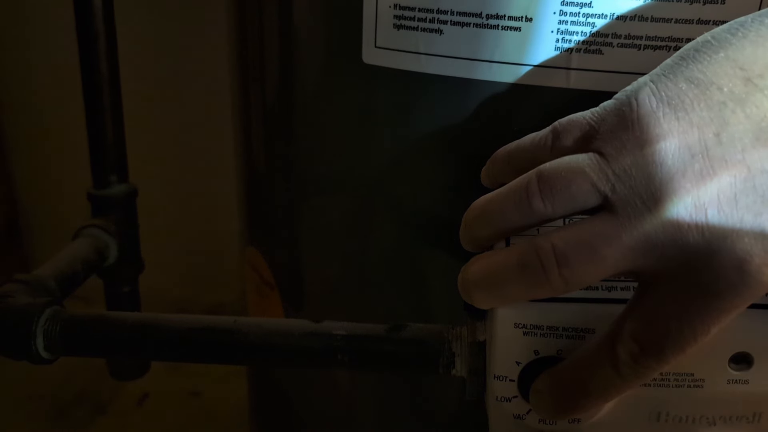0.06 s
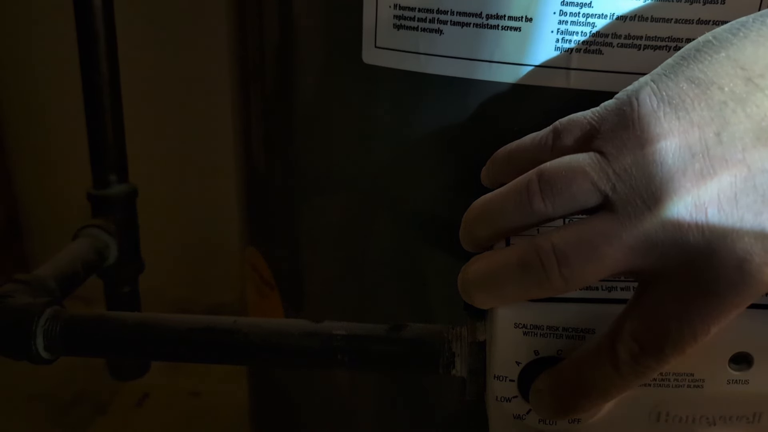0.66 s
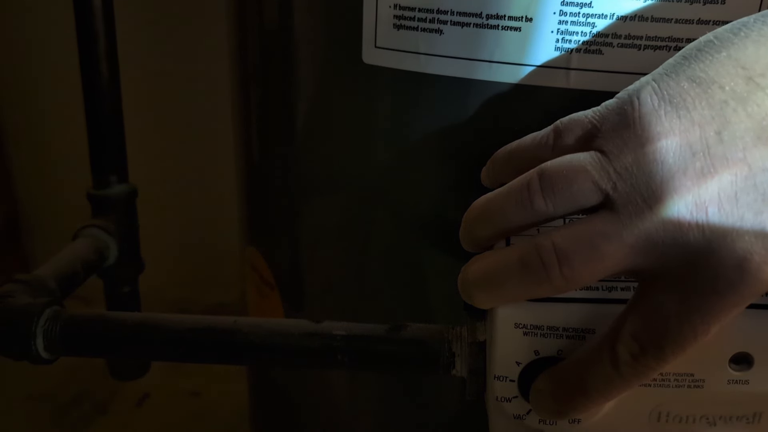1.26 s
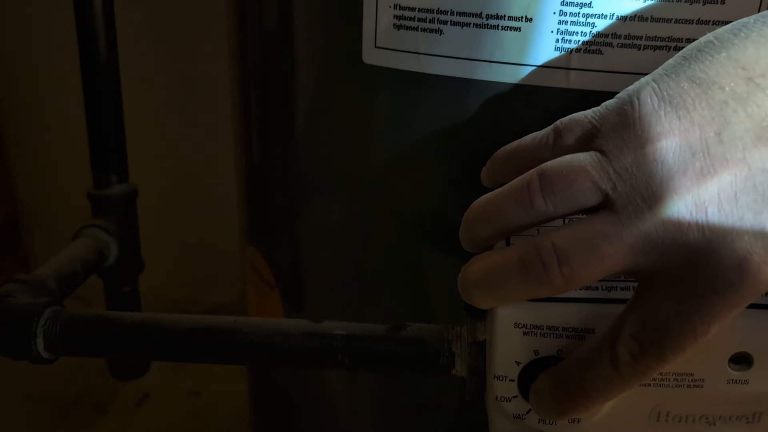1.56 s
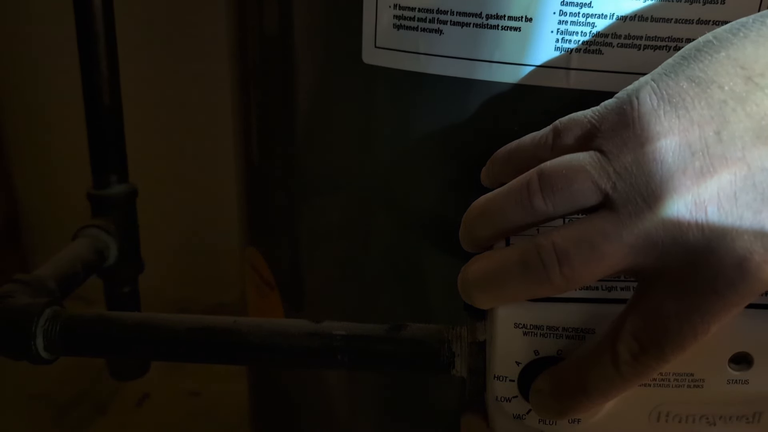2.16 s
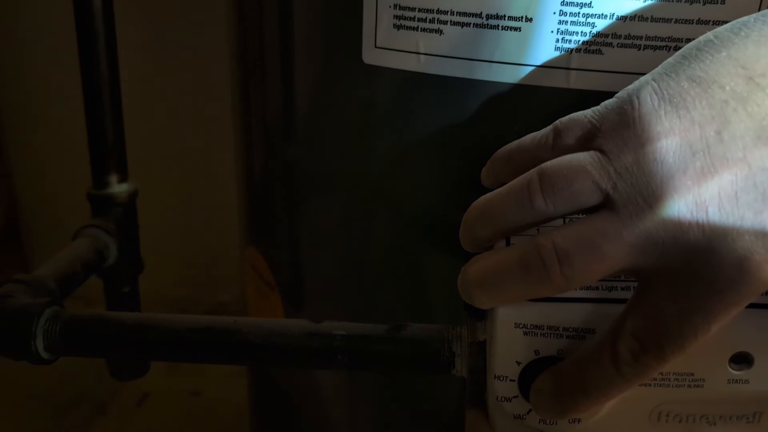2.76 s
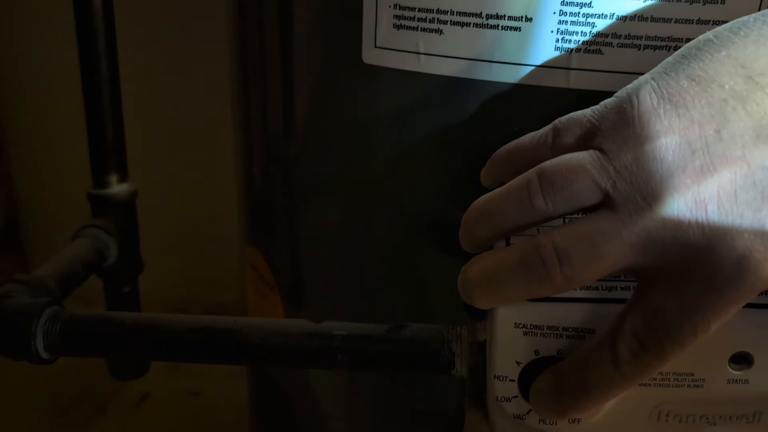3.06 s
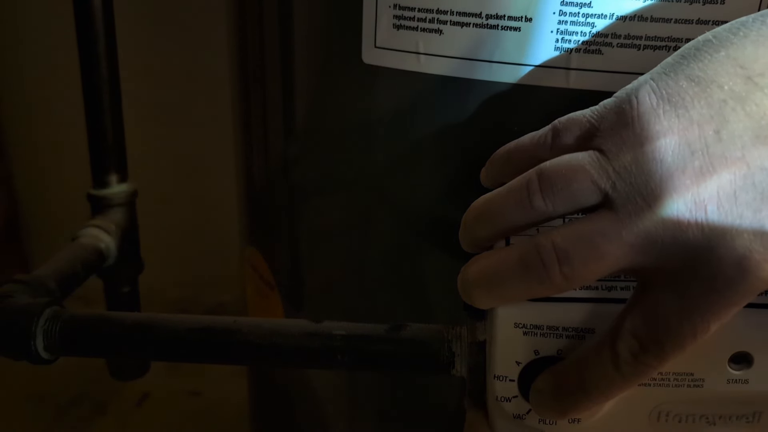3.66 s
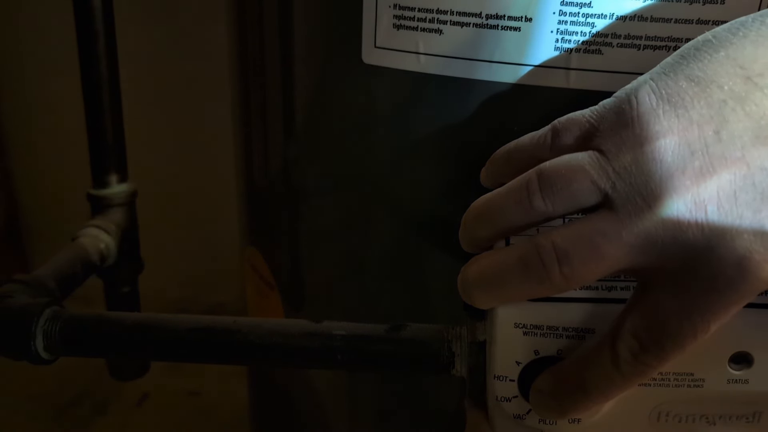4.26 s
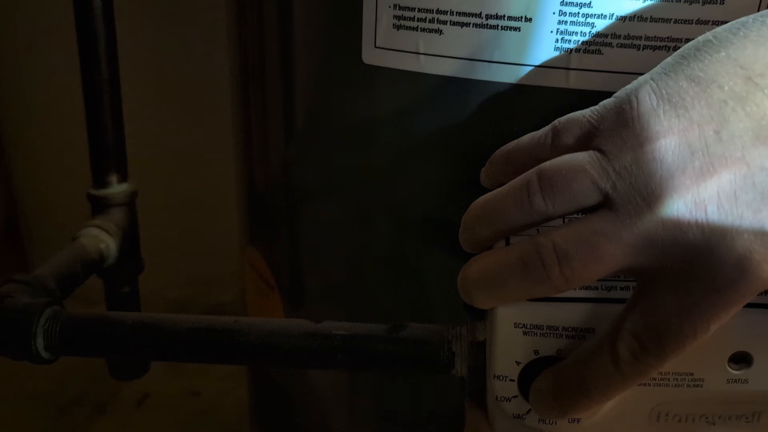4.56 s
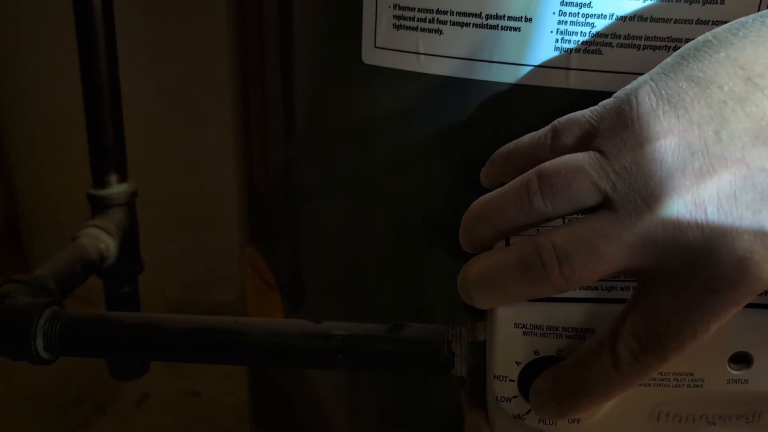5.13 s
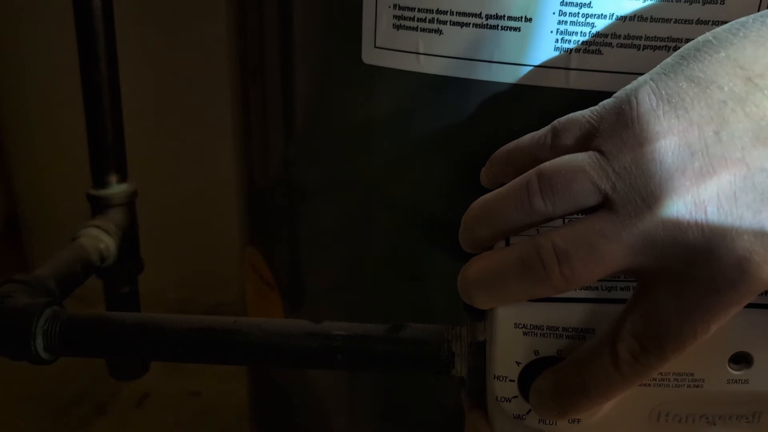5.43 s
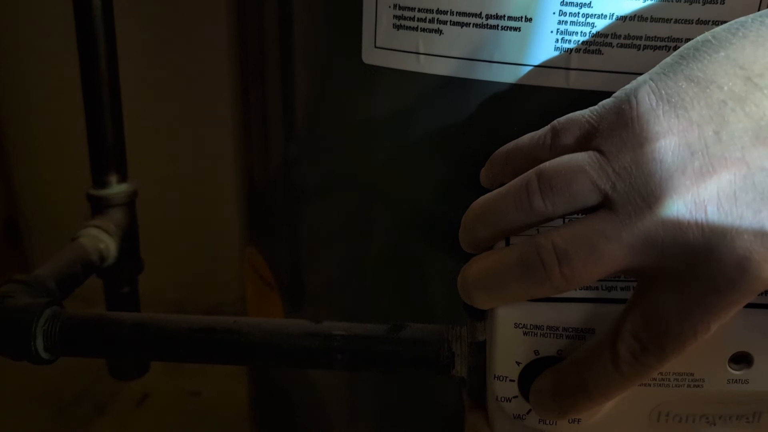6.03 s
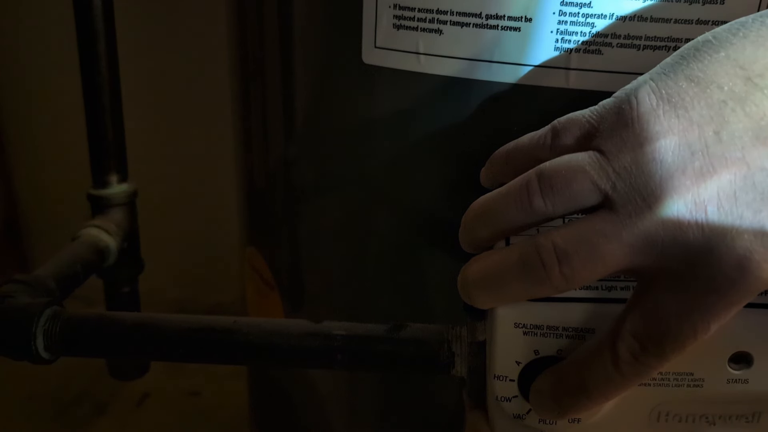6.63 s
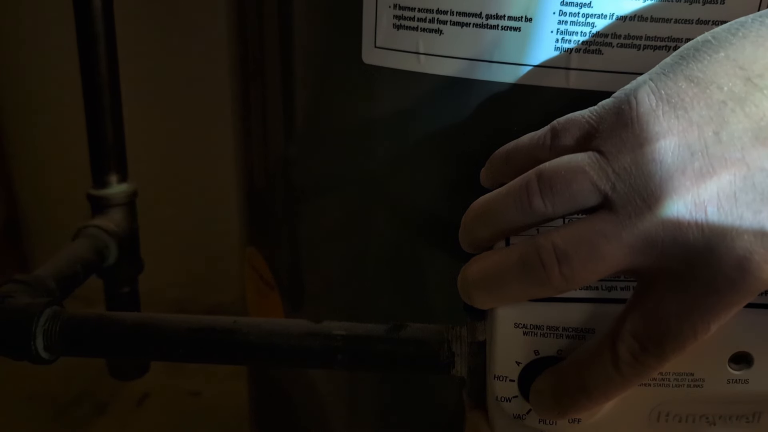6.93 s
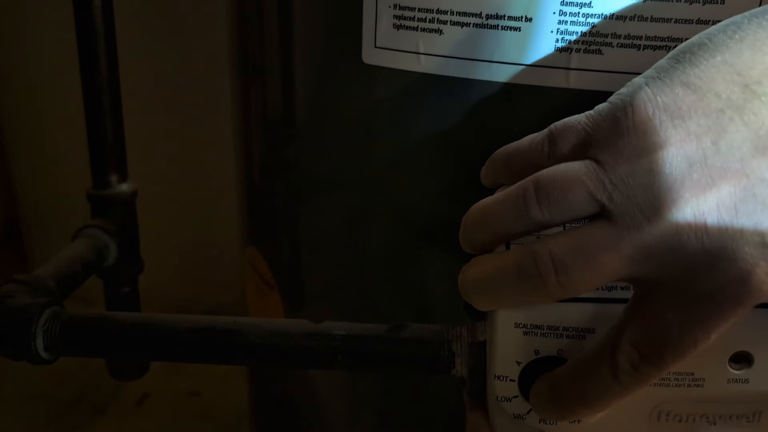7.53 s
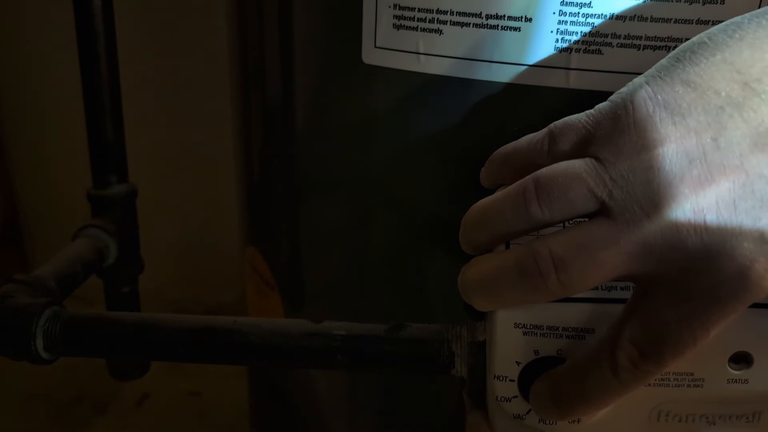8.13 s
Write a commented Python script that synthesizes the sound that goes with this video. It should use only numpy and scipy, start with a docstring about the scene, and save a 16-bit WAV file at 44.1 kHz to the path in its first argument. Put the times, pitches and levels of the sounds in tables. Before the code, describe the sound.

Close, steady snaps of a push-button igniter ring briefly through a water heater, alternating with softer plastic release clicks above a low hum.

```python
"""The piezo igniter of a gas water heater, pressed twelve times close to the microphone.
Each press trips a spring hammer whose crack rings the valve, pipes and steel jacket; the button then
snaps back with a duller click. In between, the hand rubs on the housing and the button ticks in its
guide, over a faint room hum."""
import sys
import numpy as np
from scipy import signal
from scipy.fft import rfft, irfft, next_fast_len
from scipy.io import wavfile
from scipy.ndimage import uniform_filter1d

SR = 44100
rng = np.random.default_rng(int(sys.argv[2]) if len(sys.argv) > 2 else 0)


def transcribe(u):
    """Save the signal u as a 16-bit wav file named by the first command-line argument.

    u: samples, shape (n,) or (channels, n), limited to [-1, 1]; the rate is SR.
    q: integer samples, one column per channel.
    """
    v = np.clip(np.atleast_2d(u).T, -1, 1)
    q = np.round(v * 32767).astype(np.int16)
    wavfile.write(sys.argv[1], SR, q)


N = 369999
RING_SAMPLES = 32768
TIME_S, AGE_S = np.arange(N) / SR, np.arange(RING_SAMPLES) / SR
BINS_HZ = np.fft.rfftfreq(RING_SAMPLES, 1 / SR)


def undb(db):
    """Decibels to gain."""
    return 10 ** (np.asarray(db) / 20)


def unit(x):
    """Scale to rms 1."""
    return x / np.sqrt(np.mean(x ** 2))


def fade(t60_s):
    """Exponential decay."""
    return np.exp(-np.log(1000) * AGE_S / t60_s)


def rise(rise_s):
    """Exponential build-up to 1."""
    return 1 - np.exp(-AGE_S / rise_s)


def pan(db):
    """Channel gains for left minus right dB."""
    return undb(np.array([[db], [-db]]) / 2)


def colour(x, points):
    """Filter by (f/Hz, level/dB) points joined on a log-frequency axis."""
    hz, db = np.transpose(points)[:2]
    bins_hz = np.fft.rfftfreq(x.shape[-1], 1 / SR) + 1
    gain = undb(np.interp(np.log(bins_hz), np.log(hz), db))
    return irfft(rfft(x) * gain, x.shape[-1])


def noise(points, size, alike_hz=450):
    """Coloured stereo noise of rms 1; long waves reach both channels more alike."""
    mid, side = rng.standard_normal((2, next_fast_len(size)))
    side = colour(side, [(alike_hz / 2, -6), (alike_hz * 2, 0)])
    return unit(colour(np.array([mid + side, mid - side]), points))[:, :size]


def walk(rate_hz):
    """Smooth random wander with a spread near 1."""
    step = int(SR / rate_hz)
    return uniform_filter1d(np.repeat(rng.standard_normal(N // step + 1), step), step)[:N]


def burst(points, t60_s, rise_s):
    """A knot of modes struck at once: coloured noise that swells and dies."""
    return noise(points, RING_SAMPLES) * fade(t60_s) * rise(rise_s)


def cluster(x, width_hz, ripple_db):
    """Random spectral ripple: modes crowd in places and leave gaps in others."""
    knots_hz = np.arange(400) * width_hz
    ripple = undb(ripple_db * np.interp(BINS_HZ, knots_hz, rng.standard_normal(len(knots_hz))))
    return unit(irfft(rfft(x) * ripple))


def dense_ring(table, build_cycles, width_hz, ripple_db):
    """Countless close modes: each band builds up and dies at its own rate."""
    bands_hz, _, t60s = np.transpose(table)
    spectrum = rfft(cluster(noise(table, RING_SAMPLES), width_hz, ripple_db))
    return sum(irfft(spectrum * np.interp(BINS_HZ, bands_hz, band)) * fade(t60_s) * rise(build_cycles / hz)
               for hz, t60_s, band in zip(bands_hz, t60s, np.eye(len(table))))


def vary(usual, fresh, share):
    """Part of a blow repeats each time; `share` of its power is new."""
    return np.sqrt(1 - share) * usual + np.sqrt(share) * fresh


def add(out, t_s, sound, db, bass_db=0, treble_db=0):
    """Place a blow; firm or soft contact tips its colour."""
    start, pad = int(t_s * SR), RING_SAMPLES // 8
    tilt = [(850, bass_db), (1450, 0), (3200, 0), (6500, treble_db)]
    sound = colour(np.pad(sound, ((0, 0), (pad, pad))), tilt)[:, pad:-pad]
    out[:, start:start + RING_SAMPLES] += undb(db) * sound[:, :N - start]


# room tones: f/Hz, level/dB
HUM_TONES = [(70, -69), (797, -76.5), (1497, -81.5), (1820, -81.5), (5940, -89)]
# rumble contour: t/s, relative level/dB
RUMBLE_CONTOUR = [(0, -61.5), (2.15, -54.5), (2.7, -63), (3.4, -59), (4.5, -59.5), (6.3, -65), (7.1, -63),
                  (7.75, -55.5), (8.39, -59)]
# hiss spectrum: f/Hz, level/dB
HISS_SPECTRUM = [(30, -4), (150, -1), (220, -1), (430, -3), (600, -8), (780, -6), (1150, -15.5), (1520, -8),
                 (1800, -7.5), (2400, -9.5), (4000, -12.5), (8000, -17), (15500, -24)]


def room():
    """A low rumble and thin hiss with a few wavering tones."""
    hum = sum(np.sqrt(2) * undb(db + 2 * walk(5.2)) * np.sin(2 * np.pi * hz * TIME_S + 0.63 * walk(9.8))
              for hz, db in HUM_TONES)
    rumble = noise([(25, -16), (45, -20), (64, -0.5), (82, -0.5), (110, -2), (150, -15.5),
                    (250, -35.5), (800, -69.5)], N)
    rumble *= undb(np.interp(TIME_S, *np.transpose(RUMBLE_CONTOUR)) + 2.1)
    hiss = noise(HISS_SPECTRUM, N) * undb(-63 + 0.92 * walk(4.5))
    return pan(-2) * (hiss + rumble + hum)


# grip shifts: peak t/s, level/dB, swell/s, release/s (per 20 dB; a negative pair swaps roles)
GRIP_SHIFTS = [(0.03, -56, -10.6633, 0.7691), (0.748, -47, 0.0508, 0.2328), (1.39, -44.5, 0.314, 0.3992),
               (2.251, -45, 0.2076, 0.0829), (3.02, -42, 0.2526, 0.3918), (6.49, -55, -0.483, -0.0663),
               (7.39, -51.5, 0.003, 0.1706)]


def grip(squeeze_db=-59.5, squeeze_swell_s=0.3, squeeze_release_s=0.1):
    """Rubbing envelope: each shift of the grip or squeeze on the spring swells and lets go."""
    squeezes = [(t_s, squeeze_db, squeeze_swell_s, squeeze_release_s) for t_s, *_ in HAMMER_BLOWS]
    power = sum(undb(db - 20 * np.maximum((t_s - TIME_S) / swell_s, (TIME_S - t_s) / release_s)) ** 2
                for t_s, db, swell_s, release_s in GRIP_SHIFTS + squeezes)
    return np.sqrt(power)


# skin and cloth spectrum: f/Hz, level/dB
RUB_SPECTRUM = [(120, -36.5), (200, -8.5), (358, -4), (454, -7), (957, -4), (1070, -6.5), (3010, -10),
                (3680, -13), (4100, -14), (15500, -21)]


def hand():
    """Skin and cloth rub unevenly; the sliding thumb stirs the heater around each release."""
    rub = noise(RUB_SPECTRUM, N) * grip() * undb(walk(38))
    load = sum(np.exp(-((TIME_S - t_s + 0.026) / 0.22) ** 2) for t_s, *_ in BUTTON_RETURNS)
    slide = noise([(300, -22), (560, -1.5), (790, 0.5), (1150, -23.5), (1520, 4), (1800, 1),
                   (2300, -5), (6000, -12), (15000, -24.5)], N)
    return pan(-1.3) * (rub + undb(-57.5 + 3 * walk(25)) * load * slide)


def faint_ticks(lead_s=0.1, db=-33, bass_db=4.5, treble_db=-4.5, ring_hz=1594.9):
    """Random rows like GUIDE_TICKS: the button shifts once under the thumb before each release."""
    chance = rng.standard_normal((len(BUTTON_RETURNS), 4))
    return [(t_s - lead_s * np.exp(0.19 * when), db + 3 * size, bass_db,
             treble_db + 4 * bright, ring_hz * np.exp(0.1 * pitch))
            for (t_s, *_), (when, size, bright, pitch) in zip(BUTTON_RETURNS, chance)]


# plastic button and housing: f/Hz, level/dB, t60/s
BUTTON_BANDS = [(200, -18.5, 0.055), (464.34, -13, 0.3), (793.3, 6.5, 0.15), (1007.2, -15, 0.17),
                (1500, -1, 0.15), (2681.2, -2.5, 0.14664), (4704.7, -7, 0.171), (6940, -10, 0.18),
                (15020, -11, 0.13)]
# clearest ticks: t/s, level/dB, bass/dB, treble/dB, ring f/Hz
GUIDE_TICKS = [(.115, -24.5, 10.5, -15.5, 1598), (3.435, -24.5, 10.5, -11, 782.9),
               (3.663, -27.5, 2, -8, 1508), (4.297, -22, -2, -28.5, 1820), (5.333, -24.5, 15, 7.5, 856.9),
               (5.411, -25, 4.5, 2, 781.1), (7.050, -24, 8, -20.5, 1752), (7.345, -6.5, -14, 4.5, 931.4),
               (7.386, -17, 7, -14.5, 1501), (7.459, -23.5, 7.5, -23, 1483), (7.491, -21.5, 16, -14, 1474),
               (7.792, -20, 5, -29, 1504)]


def button_ticks():
    """The plastic button ticks lightly in its guide."""
    out = np.zeros((2, N))
    for t_s, db, bass_db, treble_db, hz in GUIDE_TICKS + faint_ticks():
        tick = undb(-24) * dense_ring(BUTTON_BANDS, build_cycles=0.75, width_hz=170, ripple_db=5)
        ring = undb(-26) * np.sin(2 * np.pi * hz * AGE_S) * fade(0.05)
        add(out, t_s, tick * fade(0.3) + ring, db, bass_db, treble_db)
    return out


# modes of jacket, pipes, valve and hammer spring: f/Hz, level/dB, t60/s
HEATER_MODES = [(283, -19, .8), (527, -6, .52), (577, 0, .48), (619, 2.5, .46), (670, -3, .3),
                (739, 1, .26), (751, 4, .3), (811, -2, .34), (950, -3.5, .3), (1379, -3, .4),
                (1494, -3, .42), (1553, 3, .3), (1625, -3, .3), (1715, -2, .2), (1756, 0.5, .3),
                (1785, 0.5, .25), (1822, -3, .26), (1920, -5, .28), (2825, -6, .18), (4650, -1, .14),
                (4734, 0, .16), (4862, 0, .16), (5058, -2, .15), (5208, -1, .18), (5575, -3, .25),
                (5939, 0, .2), (5946, -24, .7), (8411, -6, .2), (9480, -24, .62), (10298, -5, .21),
                (10636, -4, .19), (11108, -4, .19)]
# wash of weaker modes, with the closet around them: f/Hz, level/dB, t60/s
WASH_BANDS = [(100, -21.5, 0.25), (210, -21.5, 0.88), (303, -9, 0.41), (420, -10.5, 0.67), (640, 7, 0.35),
              (900, -1.5, .37), (1220, -6, 0.23), (1472.6, 5, 0.28), (1640, -3.5, 0.064),
              (1750.3, 4.5, 0.32672), (2304, -1.5, 0.23747), (3550, -0.5, 0.24916), (4310, -1, .22),
              (4900, 1.5, 0.24), (5470, -1.5, .2), (6900, -2, 0.2015), (15800, -2.5, 0.18)]


def heater(wash, phases, scatter_db=2):
    """The heater rings after one blow: clear modes in a dense wash."""
    modes_hz, db, t60s = np.transpose(HEATER_MODES)
    gains = undb(db + scatter_db * rng.standard_normal(len(db)))
    modes = sum(gain * np.sin(2 * np.pi * hz * AGE_S + phase) * fade(t60_s) * rise(1.2 / hz)
                for hz, gain, t60_s, phase in zip(modes_hz, gains, t60s, phases))
    fresh = dense_ring(WASH_BANDS, build_cycles=13, width_hz=110, ripple_db=3.5)
    return undb(-33) * modes + undb(-12) * vary(wash, fresh, share=0.45)


# tick against the stop: f/Hz, level/dB
STOP_SPECTRUM = [(500, -16), (1600, 4), (4600, 11), (7500, 3), (15000, 1)]
# button snaps back: t/s, level/dB, treble/dB, ring f/Hz
BUTTON_RETURNS = [(0.4610, -4, -12, 2253), (1.0758, 2.5, -14.5, 1503), (1.8887, 4.5, -8, 1687),
                  (2.5233, 0.5, -12.5, 1465), (3.3233, -0.2985, -4.5, 1583), (4.0849, -0.5, -1.5, 2344),
                  (4.77, 0.7107, 2, 1562), (5.4693, -2.5, 3, 1788), (6.1210, -4, -7, 2445),
                  (6.8120, 1.08, -3, 2501), (7.5134, 1.1268, -11.5, 1484), (8.2129, -0.5, -9, 2553)]


def button_returns(wash, phases):
    """The button snaps back against its stop, ringing its housing and, faintly, the heater."""
    out = np.zeros((2, N))
    usual = dense_ring(BUTTON_BANDS, build_cycles=1, width_hz=70, ripple_db=-5.5)
    for t_s, db, treble_db, hz in BUTTON_RETURNS:
        bass_db = 1.0876 - 0.85 * db  # the low knock hardly grows with the snap
        stop = pan(-3.5) * undb(-13.5) * burst(STOP_SPECTRUM, t60_s=0.01933, rise_s=0.0005)
        fresh = dense_ring(BUTTON_BANDS, build_cycles=1, width_hz=110, ripple_db=5)
        body = undb(-23) * vary(usual, fresh, share=0.66)
        peak = [(hz / 2, -60), (hz / 1.2, -25), (hz, 0), (hz * 1.2192, -25), (hz * 2, -60)]
        ring = undb(-28) * burst(peak, t60_s=0.09458, rise_s=0.00037)
        # a clean release brightens the first tick more than the ring
        add(out, t_s, stop, db, bass_db, treble_db)
        add(out, t_s, body + ring + undb(-27) * heater(wash, phases), db, bass_db, 0.2 * treble_db - 7.5)
    return out


def jacket(thump_db, held_s, boom_hz=107.13, linger_s=0.19, release_s=0.08):
    """The broad steel panel thumps, then booms until just after the button is let go."""
    spectrum = [(25, -19), (60, 1.5), (130, -5), (300, -22.5), (1000, -67.5)]
    thump = undb(-47 + thump_db) * burst(spectrum, t60_s=0.35, rise_s=0.0069)
    boom = undb(-51.5) * np.sin(2 * np.pi * boom_hz * AGE_S) * fade(2.8)
    gate = np.clip((held_s + linger_s - AGE_S) / release_s, 0, 1)
    return thump + boom * gate


# hammer crack, hammer ping, valve clank: f/Hz, level/dB
CRACK_SPECTRUM = [(300, -24), (1100, -18), (1750, 2.5), (2300, -2), (3700, 2.5), (4800, 3.5), (6100, -12.5),
                  (10000, 0), (15500, 1)]
PING_SPECTRUM = [(3800, -32), (4450, -6), (4750, 3.5), (5200, -4), (5600, -16.5), (6500, -30)]
CLANK_SPECTRUM = [(1300, -30.5), (1620, -12), (1780, 3.5), (1950, -12), (2500, -32)]
# blows: t/s, level/dB, valve clank/dB, jacket thump/dB
HAMMER_BLOWS = [(0.1833, 0.1459, 7.5, -6), (0.7779, -0.1952, 5, -1), (1.5333, -1.1519, 3.5, 1),
                (2.2550, -0.8075, 1, 5), (3.0203, -1.4915, 3, -18), (3.8170, -3, -10.5, -6),
                (4.5113, -0.5, -1.5, 0.5), (5.2020, -1.744, 1.5, 10.5), (5.85, -1, -2.5, -2.5),
                (6.5312, -1.7065, -9.5, -4.5), (7.185, -1.5, -3.5, -11.5), (7.9280, -1.5, -5, 4)]


def hammer(wash, phases):
    """The steel hammer cracks against the crystal and shakes the whole heater."""
    out = np.zeros((2, N))
    for (t_s, db, clank_db, thump_db), (return_s, *_) in zip(HAMMER_BLOWS, BUTTON_RETURNS):
        crack = pan(-1.5) * undb(-0.2306) * burst(CRACK_SPECTRUM, t60_s=0.0088, rise_s=0.00086)
        ping = undb(-13.5) * burst(PING_SPECTRUM, t60_s=0.013, rise_s=0.00023)
        clank = undb(-22 + clank_db) * burst(CLANK_SPECTRUM, t60_s=0.14, rise_s=0.0006)
        # the spring trips at the same load each time, so all blows share one tilt
        add(out, t_s, crack + ping + clank + heater(wash, phases), db, bass_db=-1.473, treble_db=3.5)
        add(out, t_s, jacket(thump_db, held_s=return_s - t_s), db=0)
    return out


# stereo balance of the heater: f/Hz, left minus right level/dB
BALANCE = [(250, 0.5), (500, -3.5), (1000, -1.5), (2000, -0.1268), (4000, -2), (8000, -3.5), (12000, 1.5)]


def igniter():
    """Hammer and button on one heater, a little to the right."""
    wash = dense_ring(WASH_BANDS, build_cycles=9.1, width_hz=90, ripple_db=4.5)
    # each mode reaches the two channels a little out of step
    count = len(HEATER_MODES)
    phases = 2 * np.pi * (rng.random((count, 1, 1)) + 0.4474 * rng.random((count, 2, 1)))
    left, right = hammer(wash, phases) + button_returns(wash, phases) + button_ticks()
    return np.array([colour(left, [(hz, db / 2) for hz, db in BALANCE]),
                     colour(right, [(hz, -db / 2) for hz, db in BALANCE])])


def scene():
    """The igniter, the hand and the room."""
    return igniter() + hand() + room()


# microphone response: f/Hz, level/dB
MIC_RESPONSE = [(20, -17.5), (40, -15), (50, -7.5), (62, -0.5), (16000, -0.5)]


def record(dry):
    """The microphone sheds deep bass, the sharpest cracks clip and the top is cut."""
    clipped = np.clip(colour(dry, MIC_RESPONSE), -1, 1)
    lowpass = signal.ellip(10, 0.2, 70, 15800, fs=SR, output="sos")
    return signal.sosfilt(lowpass, clipped)


dry = scene()
out = record(dry)
transcribe(out)
```